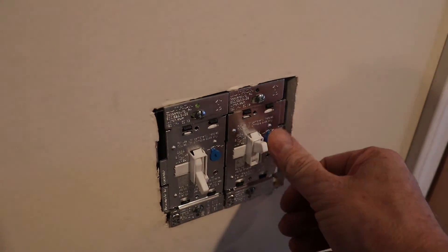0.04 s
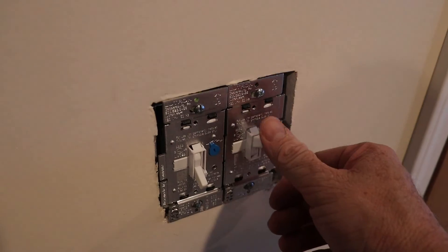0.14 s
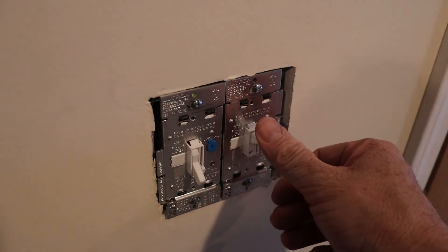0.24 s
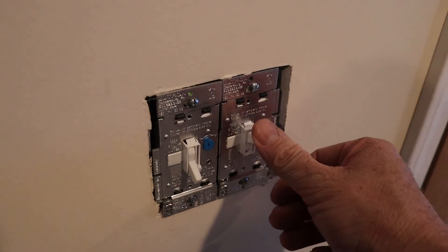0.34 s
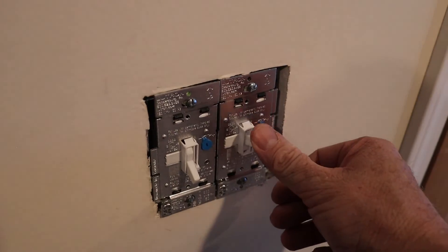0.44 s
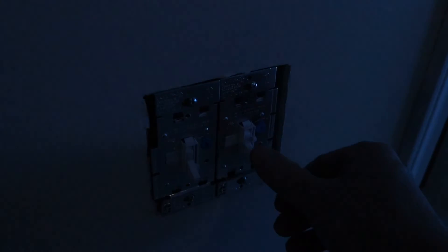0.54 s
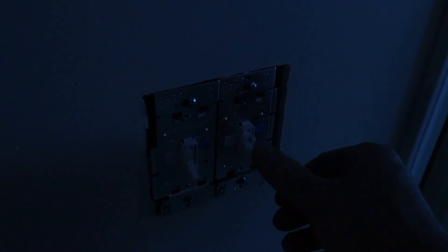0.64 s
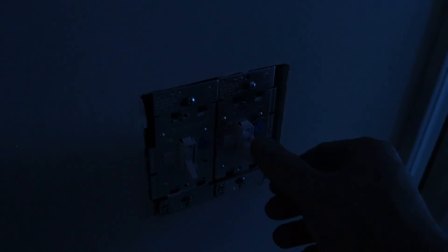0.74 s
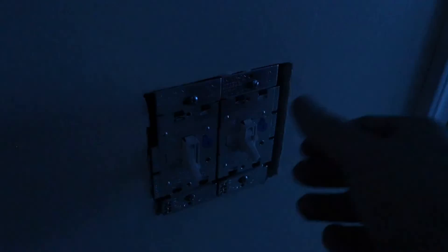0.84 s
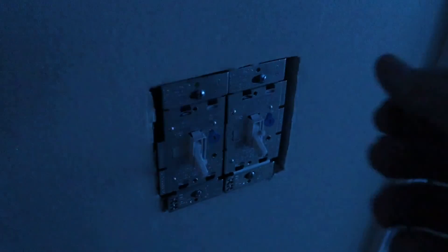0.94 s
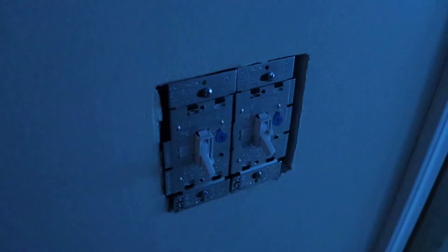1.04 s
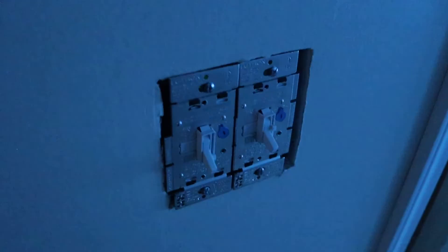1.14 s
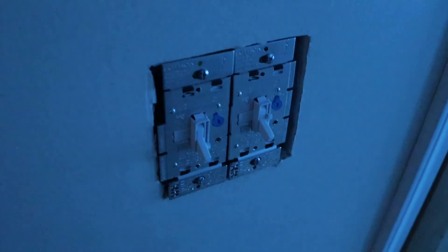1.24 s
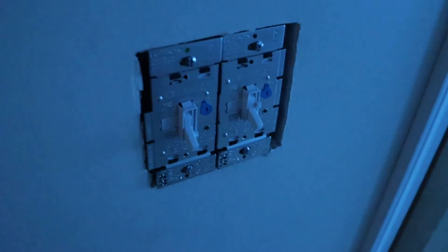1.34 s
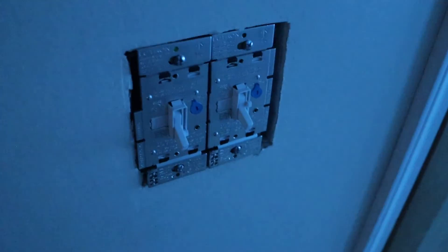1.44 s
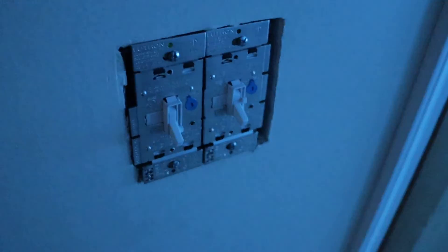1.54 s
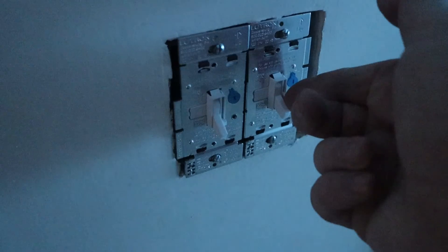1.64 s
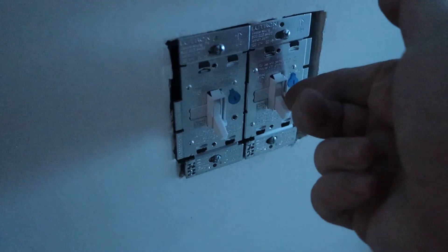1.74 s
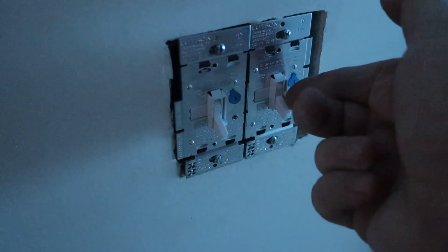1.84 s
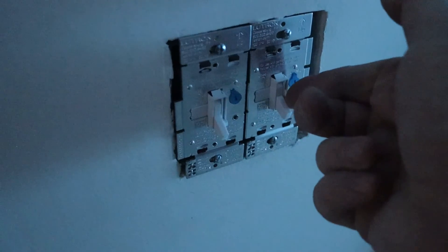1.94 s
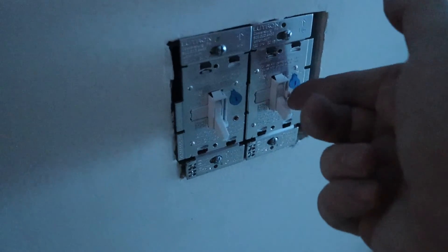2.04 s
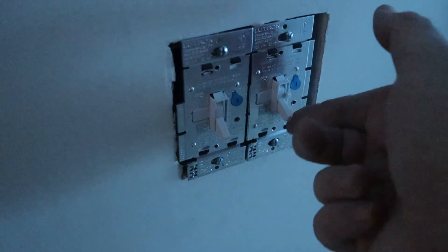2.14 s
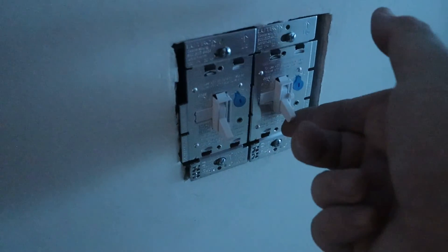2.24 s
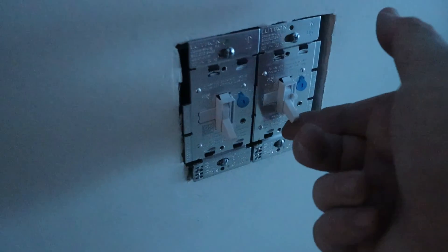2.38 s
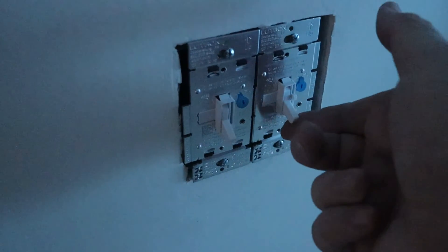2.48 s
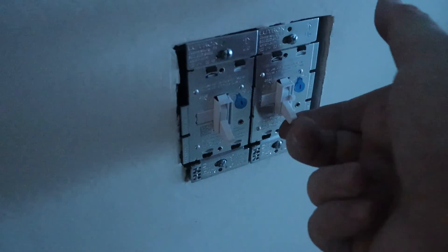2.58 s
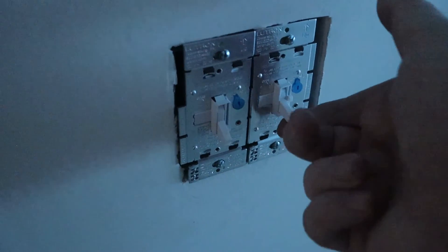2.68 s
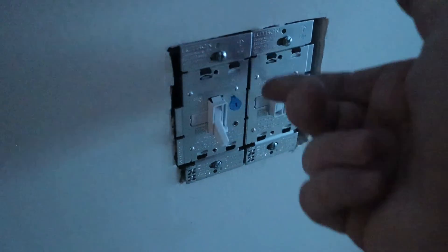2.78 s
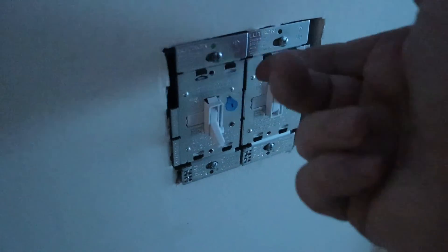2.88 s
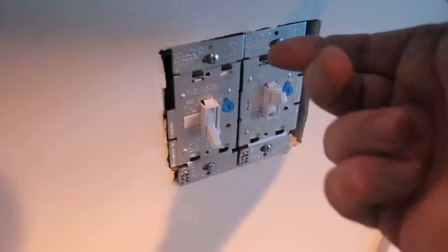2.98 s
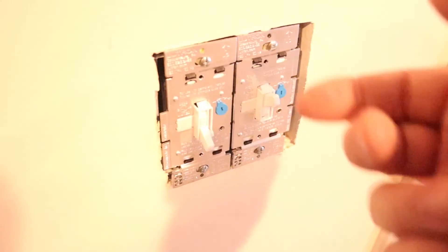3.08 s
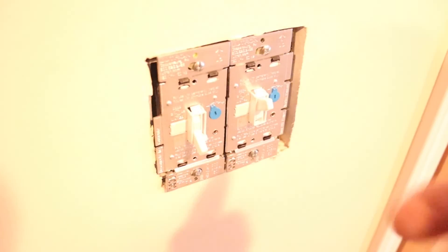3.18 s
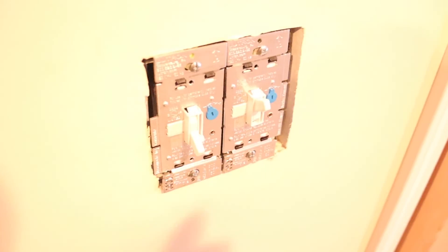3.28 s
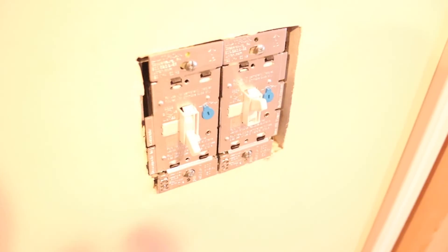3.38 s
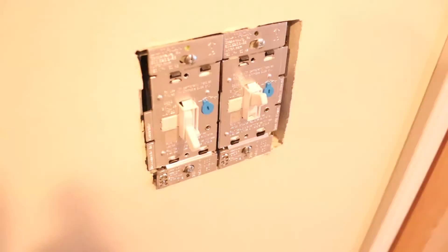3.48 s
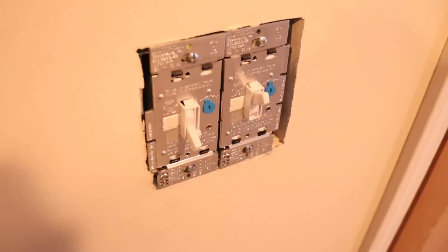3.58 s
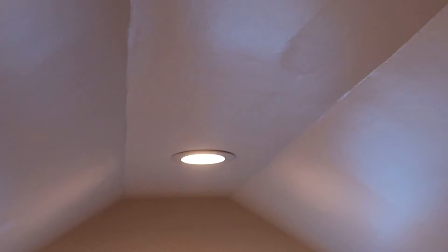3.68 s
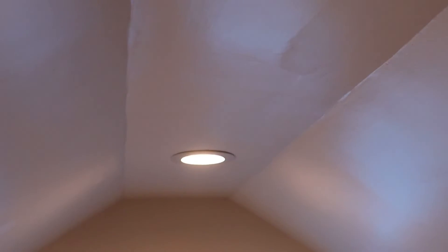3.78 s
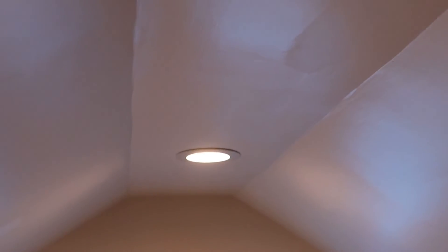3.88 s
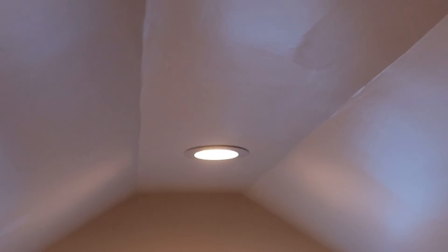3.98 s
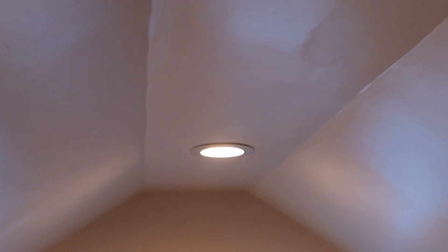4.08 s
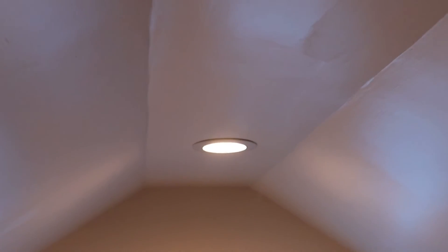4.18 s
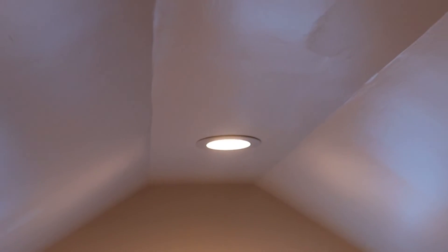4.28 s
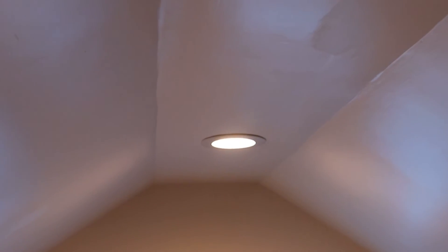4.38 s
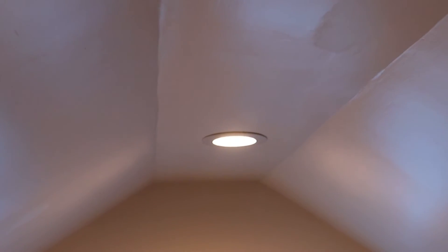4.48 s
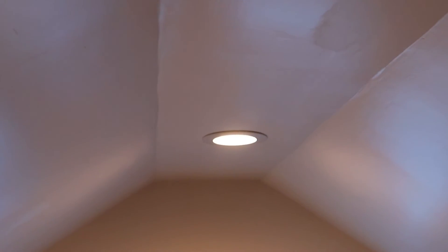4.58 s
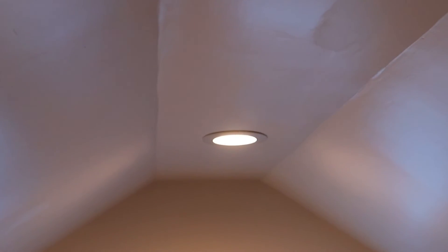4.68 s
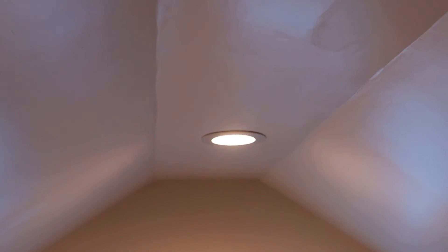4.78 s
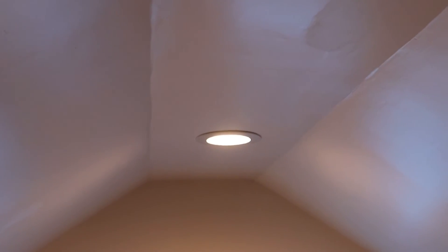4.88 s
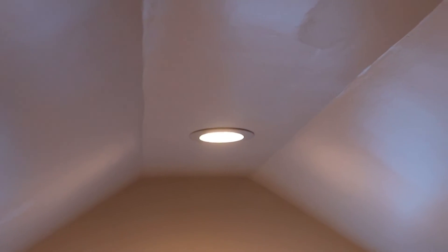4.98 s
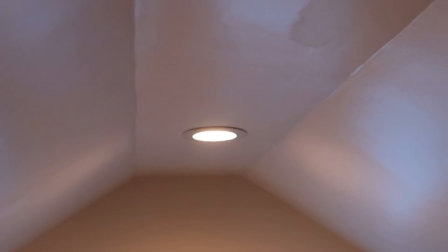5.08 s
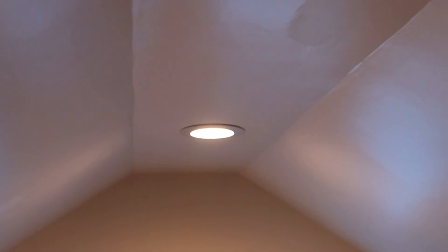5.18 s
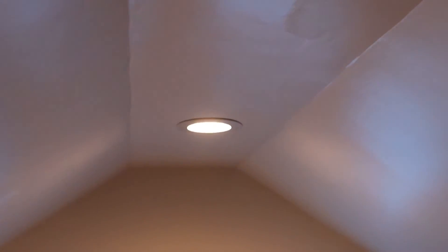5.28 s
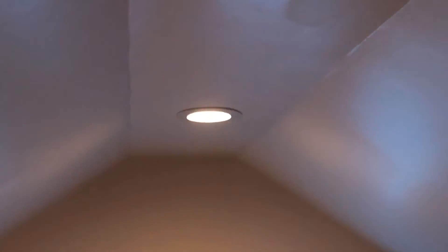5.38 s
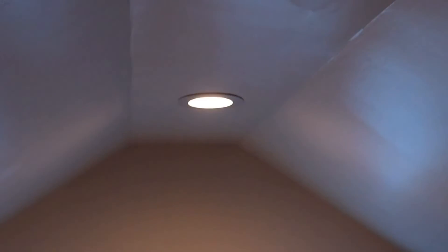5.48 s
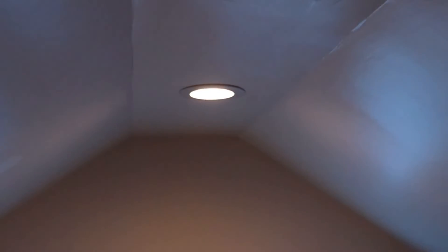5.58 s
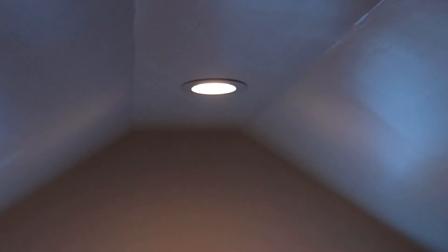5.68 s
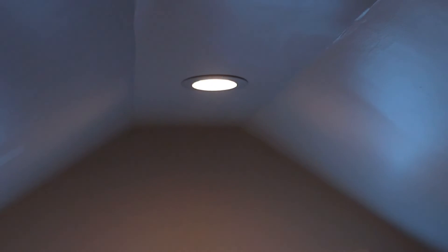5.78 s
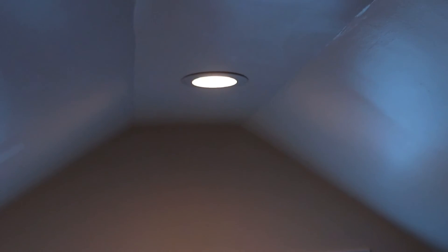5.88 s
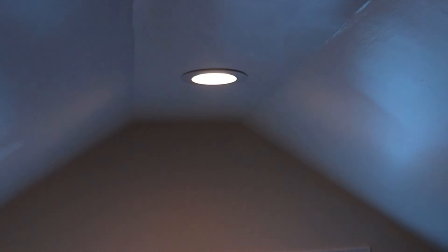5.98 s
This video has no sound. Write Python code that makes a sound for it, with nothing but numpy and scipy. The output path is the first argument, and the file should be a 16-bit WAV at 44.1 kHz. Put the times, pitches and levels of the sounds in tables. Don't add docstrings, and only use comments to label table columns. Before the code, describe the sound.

A plastic wall switch creaks and snaps down, then snaps up louder two seconds later, followed by soft handling bumps in a quiet room.

```python
import sys
import numpy as np
from scipy import signal
from scipy.fft import rfft, irfft, next_fast_len
from scipy.io import wavfile
from scipy.ndimage import uniform_filter1d

SR = 44100
rng = np.random.default_rng(int(sys.argv[2]) if len(sys.argv) > 2 else 0)


def volts(x):
    e = np.asarray(x, float) / 20
    return 10 ** e


def master(y):
    cut = np.clip(np.atleast_2d(y).T, -1, 1)
    pcm = np.round(cut * 32767)
    wavfile.write(sys.argv[1], SR, pcm.astype(np.int16))


N = 265790
FAST = next_fast_len(N)

# frequency in Hz, level in dB per Hz.
HISS_COLOUR = [(26, -21), (45, -6.5), (124, -6.5), (198, -10.5), (302, -12), (406, -19.5), (448, -13),
               (602, -16.5), (790, -14.5), (1140, -14.5), (1360, -15.5), (2070, -17.5), (12600, -28),
               (15300, -26), (16500, -40.5)]
HISS_DB = -59.5
# frequency in Hz, likeness from -1 to 1.
LIKENESS = [(60, 0.8), (130, 0.58), (290, 0.72), (640, 0.3), (1410, 0.05), (3100, 0.04), (6820, -0.08),
            (15000, -0.079)]
# time in seconds, level in dB.
RUMBLE_LEVEL = [(0, -63), (.7, -60.5), (1.16, -69.5), (1.54, -59), (1.83, -68), (2.06, -63), (2.35, -56.5),
                (2.92, -59), (3.1, -57), (3.4, -63), (3.63, -56), (4.11, -65.5), (4.35, -72.5),
                (4.58, -64.5), (5.24, -55), (5.67, -66), (6.03, -64)]
# frequency in Hz, level in dB per Hz.
RUMBLE_COLOUR = [(47, -47), (80, -27.5), (227, 0.5), (490, -6.5), (537, -16), (582, -9.5), (900, -14.5),
                 (1170, -53.5), (1980, -120)]
# frequency in Hz, level in dB, width in Hz.
HUM = [(57.7, -67.5, 4.6), (118.3, -73.5, 18), (14900, -88.5, 30)]
# frequency in Hz, level in dB, width in Hz.
WHINE = [(12300, -81.5, 400), (12800, -83, 300)]
WHINE_FROM_S = 3.74

# start in seconds, length in seconds, peak in dB,
# share of the length spent rising, treble in dB.
SCRAPES = [
    (.143, 0.021, -59, 0.33, -6),
    (.275, 0.066, -54, .12, -4),
    (.632, 0.021, -56, .98, 1),
    (2.0, 0.053, -64.5, .3, -8),
    (2.16, .05, -61.5, .1, -10.5),
    (2.82, 0.032, -61, 0.66, -7),
    (2.847, 0.014, -45, .12, -3.5),
    (2.857, 0.0095, -49.5, .9, -5),
]
SCRAPE_EDGES_DB = -0.5, -18
# frequency in Hz, width in Hz, level in dB.
SCRAPE_TONES = [(2000, 150, -0.5), (2490, 410, -6), (1050, 200, -8), (4330, 1000, -3.5), (7600, 1200, -6.5)]
# start in seconds, strap level in dB,
# centre of the push in Hz, wall level in dB.
CREAKS = [(.278, -50, 990, -62), (0.2853, -46, 1070, -57), (.361, -45, 1050, -53.5), (.373, -55, 1150, -58),
          (0.384, -50, 1050, -62), (.4, -51, 900, -60), (0.4118, -37.5, 1050, -51.5),
          (0.42, -38.5, 1080, -53), (.4295, -36.5, 900, -66), (0.4373, -36.5, 980, -67),
          (.454, -49, 850, -62), (.461, -50, 950, -68), (0.4711, -38, 1030, -50), (0.486, -40, 990, -57),
          (0.503, -43, 970, -61), (.522, -38.5, 950, -46.5), (0.5231, -42, 2350, -53),
          (0.533, -58, 800, -60)]
CREAK_TICK_DB, CREAK_PAN_DB = -26, -1
# start in seconds, strap level in dB,
# centre of the push in Hz, wall level in dB, left minus right in dB.
STOPS = [
    (0.6479, -29.5, 1570, -35.5, -10),
    (.66, -20.5, 1710, -38.5, 5),
    (0.6638, -25.5, 950, -44, -9),
    (.676, -43, 1900, -35.5, -1),
    (2.848, -33, 1400, -47.5, 2),
    (2.8721, -11, 1120, -34, 0.5),
    (2.8772, -20, 3700, -39, 10),
    (2.882, -25, 1500, -40.5, 0.5),
    (2.892, -28.5, 1500, -58, -12.5),
    (2.906, -28, 1000, -41, 3),
]
# start in seconds, strap level in dB, centre of the push in Hz,
# tick level in dB, left minus right in dB.
CONTACTS = [
    (.6558, -37, 6000, -16, 3),
    (.657, -16, 2500, -17.5, -6),
    (2.811, -47.5, 3000, -51, -8),
    (2.8676, -23.5, 5200, -14, 0),
    (2.8718, -6, 2500, -8.5, -4.5),
]
WALL_UNDER_TICK_DB, TICK_UNDER_STOP_DB = -23.5, -26
HELD_UNTIL_S = 1.5
HELD = dict(reach_db=10.5, damping_db=70, rise_cycles=1.6)
FREE = dict(reach_db=7, damping_db=60, rise_cycles=0.95)
# frequency in Hz, level in dB,
# seconds to fall by 60 dB.
STRAP = [(800, 3.5, 0.034), (900, 0.5, 0.023), (1030, -2, 0.022), (1170, -4.5, 0.01), (1500, -8, 0.03),
         (1838, 1.5, 0.022), (2092, -1.5, 0.02), (2190, -3, 0.02), (2512, -2, 0.017), (2707, -5.5, 0.021),
         (3186, -2, 0.017), (3760, -6, 0.018), (3983, -6, .02), (4190, -9.5, 0.012), (4570, -2.5, 0.016),
         (5240, -5.5, 0.025), (5870, -6, 0.031), (803, -3.5, 0.063), (1030, -19, 0.1), (1545, -17.5, 0.07),
         (1847, -22, 0.14), (2100, -13, 0.09), (2520, -24, 0.08)]
# frequency in Hz, level in dB, seconds to fall by 60 dB.
WALL = [(122.5, 0, 0.27), (172.4, -11.5, .2), (246, -4.5, 0.069), (335.5, -2, 0.068), (420, -5.5, 0.052),
        (534, -7, .06), (684, -3, .07)]
# frequency in Hz, level in dB per Hz.
TICK_COLOUR = [(1760, -48), (3000, -12), (3970, -5), (5520, -0.5), (7730, -11.5), (10800, -6.5),
               (11900, -10), (14100, -4), (15800, -12.5), (16700, -33.5)]
# frequency in Hz, left minus right in dB.
TICK_LEFT = [(60, -8.5), (110, 6.5), (200, 3), (380, 2), (700, -5), (1290, -3.5), (2380, 3.5), (4400, -3),
             (8120, -9), (15000, -17.5)]
# frequency in Hz, seconds to fall by 60 dB.
ROOM = [(100, 0.22), (500, 0.29), (2000, 0.21), (6000, 0.3), (15000, 0.11)]
ROOM_DB = -17

# start in seconds, level in dB, frequency in Hz,
# seconds to fall by 60 dB, left minus right in dB.
THUDS = [
    (3.757, -41.5, 127, 0.13, 2),
    (1.5, -49, 253, 0.078, -9),
    (1.434, -46, 280, 0.067, -9),
    (0.88, -49, 230, 0.092, -8),
    (1.497, -46, 215, 0.22, -21.5),
    (3.67, -45.5, 215, 0.16, -14),
]
# start in seconds, peak in dB, ring in Hz,
# left minus right in dB, bright crack in dB.
GRIP_KNOCKS = [(3.39, -47, 1000, -1.5, -64), (3.76, -51, 910, 3, -63), (4.07, -58.5, 1170, -13.5, -60),
               (4.439, -58, 710, -1.0, -71), (4.564, -47, 2200, 10, -63), (4.579, -48.5, 942, -3, -70),
               (4.64, -55, 1310, -9, -67.5), (4.718, -45, 900, 3, -54.5), (4.735, -47, 953, -2, -75),
               (4.913, -46, 636, -7, -60), (5.048, -43, 1210, -14, -55.5), (5.575, -47.5, 930, -17, -63.5),
               (5.629, -49, 1200, -18, -53)]
# time in seconds, pressure in dB, speed from 0 to 1.
RUBS = [
    [(1.468, -55, 0.93), (1.51, -47, 0.26), (1.594, -51.5, 0.83), (1.622, -46, 0.91), (1.646, -46, 0.7),
     (1.671, -51.5, 0.9)],
    [(3.654, -55.5, 0.65), (3.69, -53, 0.32), (3.695, -46, 0.7), (3.705, -49, 0.94), (3.729, -44, 0.7),
     (3.741, -52.5, 0.56)],
]
# start in seconds, length in seconds, peak in dB,
# share of the length spent rising, speed from 0 to 1.
TOUCHES = [
    (1.397, 0.03, -56.5, 0.15, .12),
    (1.43, 0.029, -55, 0.35, 0.27),
]
TOUCH_EDGES_DB = -7, -23
# frequency in Hz, level in dB per Hz.
RUB_COLOUR = [(71, -40), (120, -13), (247, -2.5), (540, -7), (867, 0.5), (1110, -8.5), (1710, -6),
              (2580, -10), (2810, -16), (3170, -8.5), (3670, -12), (4510, -8.5), (7390, -15.5), (14900, -9),
              (16500, -34)]
# frequency in Hz, left minus right in dB.
RUB_LEFT = [(60, 1.5), (110, -7), (200, -37), (380, -4), (700, -9.5), (1290, -8.5), (2380, -4.5),
            (4400, -31), (8120, -24), (15000, -35)]
# frequency in Hz, likeness from -1 to 1.
RUB_LIKENESS = [(60, 0.34), (130, 0.086), (290, -0.26), (640, 0.83), (1410, -0.56), (3100, -0.0082),
                (6820, 0.36), (15000, 0.16)]
TREBLE_DB, BASS_DB = (-16.5, 0.2), (9.5, -11)
# start in seconds, length in seconds, peak in dB, share of the length spent rising.
SLEEVE = [
    (3.39, 0.35, -63.5, 0.47),
    (3.745, .11, -60, .05),
]
SLEEVE_EDGES_DB = -8.5, -9
# frequency in Hz, level in dB per Hz.
CLOTH_COLOUR = [(300, -29.5), (700, 4.5), (1200, -2), (2500, -1.5), (4000, -8), (7000, -15), (12000, -31)]


def evened(x):
    return x / np.sqrt(np.mean(x ** 2) + 1e-20)


def read(points, hz):
    f, value = np.transpose(points)
    return np.interp(np.log(hz + 1), np.log(f + 1), value)


def add(mix, s, sound):
    part = mix[..., round(s * SR):][..., :sound.shape[-1]]
    part += sound[..., :part.shape[-1]]


def panned(x, pan_db):
    return x * volts(np.array([[pan_db / 2], [-pan_db / 2]]))


def noise(colour, likeness, patchy_db):
    frames, hz = N // 128 + 5, np.fft.rfftfreq(512, 1 / SR)
    a, b, c, d, patches = rng.standard_normal((frames, 257, 5)).T
    patches = uniform_filter1d(patches, 6, 0)
    patches = evened(uniform_filter1d(patches, 12, 1))
    like = np.clip(read(likeness, hz), -1, 1)[:, None]
    left = a + 1j * b
    right = like * left + np.sqrt(1 - like ** 2) * (c + 1j * d)
    z = np.array([left, right]) * volts(patchy_db * patches)
    x = signal.istft(z, nperseg=512, noverlap=384)[1][:, :N]
    gain = volts(read(colour, np.fft.rfftfreq(FAST, 1 / SR)))
    return evened(irfft(rfft(x, FAST) * gain, FAST)[:, :N])


def resonate(x, hz, width_hz):
    r = np.exp(-np.pi * width_hz / SR)
    return signal.lfilter([1 - r, 0, r - 1], [1, -2 * r * np.cos(2 * np.pi * hz / SR), r * r], x)


def swells(rows, edges_db):
    tables = []
    for s, length, db, rise, *rest in rows:
        peak_s = s + np.clip(rise, 0.01, 0.99) * length
        tables.append([(s, db + edges_db[0], *rest), (peak_s, db, *rest), (s + length, db + edges_db[1], *rest)])
    return tables


def stroked(tables, middle, *others):
    t, out = np.arange(N) / SR, 0
    for rows in tables:
        s, *columns = np.transpose(rows)
        level_db, *shares_db = (np.interp(t, s, c) for c in columns)
        touching = uniform_filter1d(1.0 * (t > s[0]) * (t < s[-1]), size=60)
        layers = middle + sum(volts(db) * v for db, v in zip(shares_db, others))
        out = out + touching * volts(level_db) * layers
    return out


def fuzzy_line(hz, db, width_hz, fuzz=0.85):
    r = np.exp(-np.pi * width_hz / SR)
    waver = signal.lfilter([1], [1, -r], rng.standard_normal(N) + 1j * rng.standard_normal(N))
    tone = np.exp(2j * np.pi * hz * np.arange(N) / SR)
    return volts(db) * evened(((1 + fuzz * waver / np.std(waver)) * tone).real)


def background():
    t = np.arange(N) / SR
    swell = volts(np.interp(t, *np.transpose(RUMBLE_LEVEL)) - 3)
    rumble = swell * noise(RUMBLE_COLOUR, LIKENESS, patchy_db=1.2)
    whine = (t > WHINE_FROM_S) * sum(fuzzy_line(*row, fuzz=1.8) for row in WHINE)
    hiss = volts(HISS_DB) * noise(HISS_COLOUR, LIKENESS, patchy_db=0.5)
    hum = sum(fuzzy_line(*row) for row in HUM)
    return hiss + rumble + whine + hum


def ring(modes, t, share_db):
    hz, db, t60 = np.transpose(modes)[:, :, None]
    sign = (-1.0) ** np.arange(len(modes))[:, None]
    level = volts(db + share_db[:, None] - 60 * t / t60)
    return (sign * level * np.sin(2 * np.pi * hz * t)).sum(0)


def contact_tick():
    t, hz = np.arange(1024) / SR, np.fft.rfftfreq(1024, 1 / SR)
    colour_db = read(TICK_COLOUR, hz) + np.outer([0.5, -0.5], read(TICK_LEFT, hz))
    burst = evened(irfft(rfft(rng.standard_normal(1024)) * volts(colour_db)))
    return burst * volts(-60 * t / 0.0083) * (1 - np.exp(-t / 0.00044))


def blow(strap_db, centre_hz, tick_db, wall_db, pan_db, reach_db, damping_db, rise_cycles):
    t = np.arange(SR // 3) / SR
    chance = rng.standard_normal((2, 30))
    octaves = np.log2(np.transpose(STRAP)[0] / centre_hz)
    share_db = chance[0, :len(STRAP)] - reach_db * octaves ** 2
    strap = ring(STRAP, t, share_db) * volts(-damping_db * t)
    strap = strap * (1 - np.exp(-t * centre_hz / rise_cycles))
    wall = ring(WALL, t, 2 * chance[1, :len(WALL)]) * (1 - np.exp(-t / 0.005))
    tick = contact_tick()
    loose = evened(resonate(rng.standard_normal(len(t)), centre_hz, 0.43 * centre_hz))
    loose = loose * volts(-8.5 - 60 * t / 0.015) * (1 - np.exp(-t / 0.0012))
    strap = strap / abs(strap).max() + loose
    out = panned(volts(strap_db) * strap, pan_db) + volts(wall_db) * wall
    add(out, 0, volts(tick_db) * tick)
    return out


def scraping():
    rough = rng.standard_normal(N)
    song = 0
    for hz, width_hz, db in SCRAPE_TONES:
        song = song + volts(db) * evened(resonate(resonate(rough, hz, width_hz), hz, 2 * width_hz))
    air = evened(np.diff(rough, n=2, prepend=[0, 0]))
    return panned(stroked(swells(SCRAPES, SCRAPE_EDGES_DB), evened(song), air), -6.5)


def switch():
    out = scraping()
    snaps = []
    for s, db, hz, tick_db, pan_db in CONTACTS:
        snaps.append((s, db, hz, tick_db, tick_db + WALL_UNDER_TICK_DB, pan_db))
    for s, db, hz, wall_db, pan_db in STOPS:
        snaps.append((s, db, hz, db + TICK_UNDER_STOP_DB, wall_db, pan_db))
    for s, *row in sorted(snaps):
        add(out, s, blow(*row, **(HELD if s < HELD_UNTIL_S else FREE)))
    for s, db, hz, wall_db in CREAKS:
        add(out, s, blow(db, hz, db + CREAK_TICK_DB, wall_db, CREAK_PAN_DB,
                         reach_db=27.0, damping_db=500, rise_cycles=3.2))
    return out


def room(x):
    taps = np.zeros((2, SR // 2))
    at = np.arange(200, SR // 2 - 20, 20)
    at = at + rng.integers(0, 20, (2, len(at)))
    np.put_along_axis(taps, at, rng.choice([-1.0, 1.0], at.shape), 1)
    hz, t, z = signal.stft(taps, SR, nperseg=256)
    fade = volts(-60 * t / read(ROOM, hz)[:, None])
    tail = signal.istft(z * fade, SR, nperseg=256)[1]
    return signal.fftconvolve(x, tail / np.linalg.norm(tail[0]), axes=1)[:, :N]


def grip():
    out, t = np.zeros((2, N)), np.arange(SR // 8) / SR
    for s, db, hz, t60, pan_db in THUDS:
        thud = volts(db - 60 * t / t60) * np.sin(2 * np.pi * hz * t)
        add(out, s, panned(thud * (1 - np.exp(-t / 0.0042)), pan_db))
    for s, db, hz, pan_db, crack_db in GRIP_KNOCKS:
        rattle = evened(resonate(resonate(rng.standard_normal(len(t)), hz, 430), hz, 700))
        knock = 0.75 * rattle + 0.87 * np.sin(2 * np.pi * hz * t)
        knock = knock * volts(db - 4.5 - 60 * t / 0.024)
        crack = evened(resonate(rng.standard_normal(len(t)), 3800, 2200))
        crack = crack * volts(crack_db - 60 * t / 0.036)
        add(out, s, panned((knock + crack) * (1 - np.exp(-t / 0.00038)), pan_db))
    return out


def rubbing():
    hz = np.fft.rfftfreq(FAST, 1 / SR)
    z = rfft(noise(RUB_COLOUR, RUB_LIKENESS, patchy_db=2.8), FAST)
    z = z * volts(np.outer([1, 0], read(RUB_LEFT, hz)))
    low = 1 / (1 + (hz / 1200) ** 4)
    high = 1 / (1 + (6500 / (hz + 1)) ** 4)
    bands = [irfft(z * share, FAST)[:, :N] for share in (low, 1 - low - high, high)]
    bass, middle, treble = (v / v.mean(0).std() for v in bands)
    grit = evened(volts(evened(uniform_filter1d(rng.standard_normal(N), size=40))))
    strokes = []
    for rows in RUBS + swells(TOUCHES, TOUCH_EDGES_DB):
        strokes.append([(s, db, np.interp(speed, (0, 1), TREBLE_DB), np.interp(speed, (0, 1), BASS_DB))
                        for s, db, speed in rows])
    return stroked(strokes, middle, treble, bass) * grit


def sleeve():
    cloth = noise(CLOTH_COLOUR, LIKENESS, patchy_db=3.0) * np.sqrt(2)
    return stroked(swells(SLEEVE, SLEEVE_EDGES_DB), cloth)


def scene():
    near = switch()
    return near + volts(ROOM_DB) * room(near) + grip() + rubbing() + sleeve() + background()


def top_cut(x):
    return signal.sosfilt(signal.butter(12, 16810, fs=SR, output="sos"), x)


def record(dry):
    low_cut = signal.butter(3, 50, "high", fs=SR, output="sos")
    thin = signal.sosfilt(low_cut, dry)
    return top_cut(thin)


dry = scene()
out = record(dry)
master(out)
```